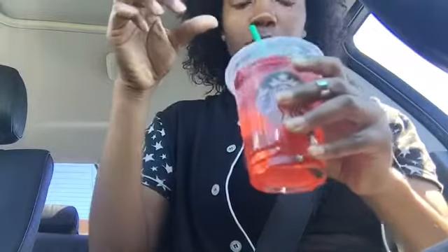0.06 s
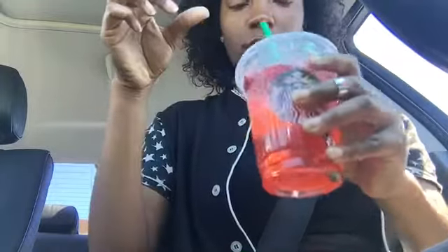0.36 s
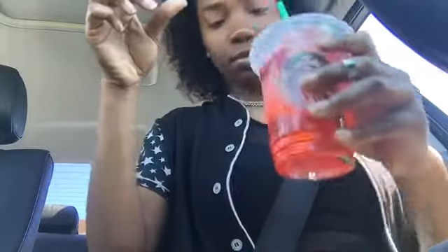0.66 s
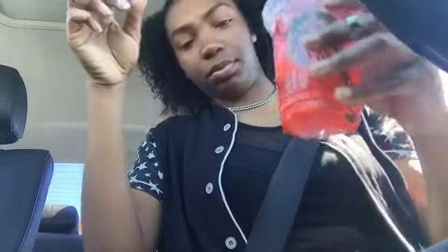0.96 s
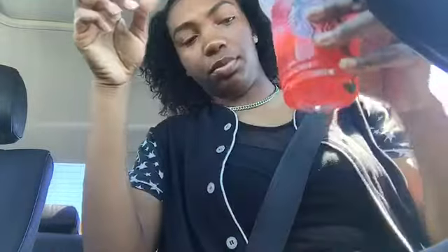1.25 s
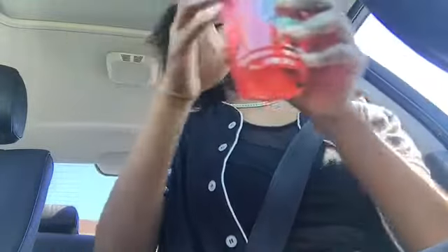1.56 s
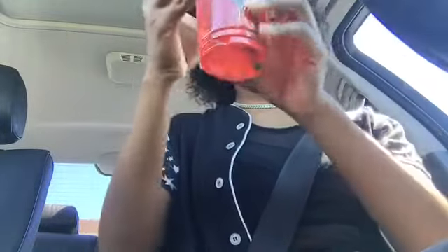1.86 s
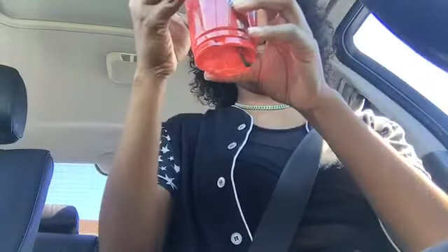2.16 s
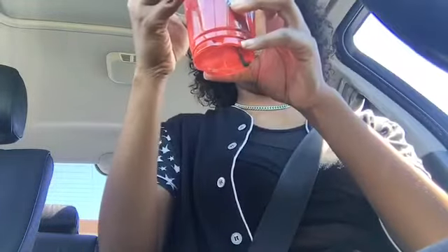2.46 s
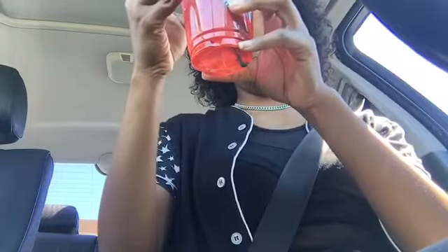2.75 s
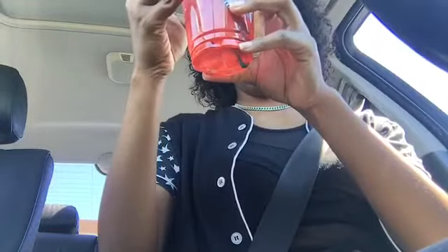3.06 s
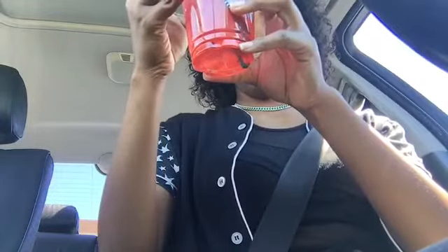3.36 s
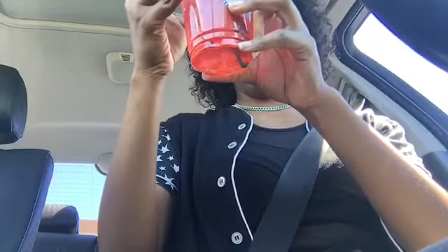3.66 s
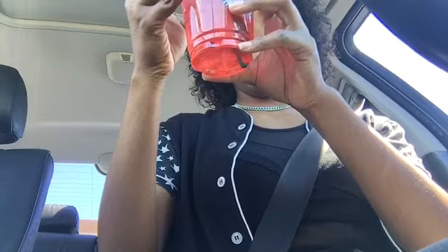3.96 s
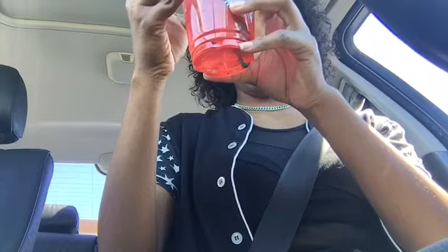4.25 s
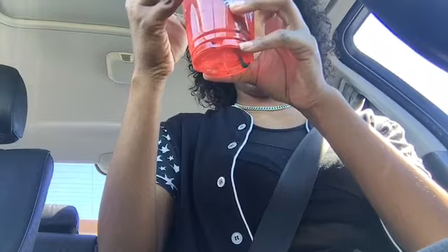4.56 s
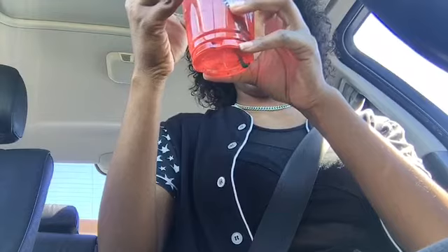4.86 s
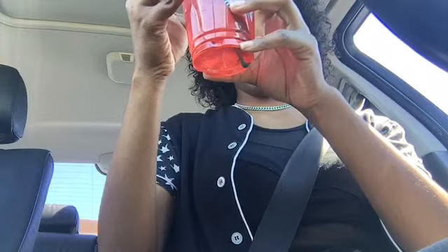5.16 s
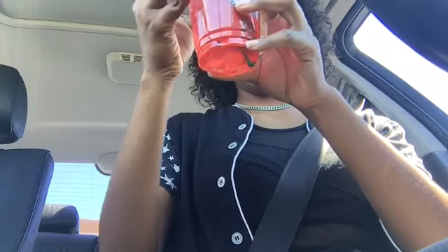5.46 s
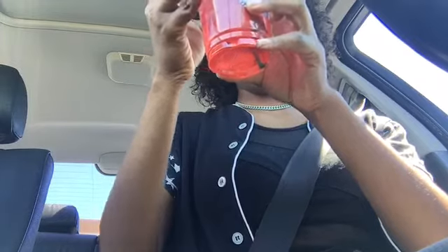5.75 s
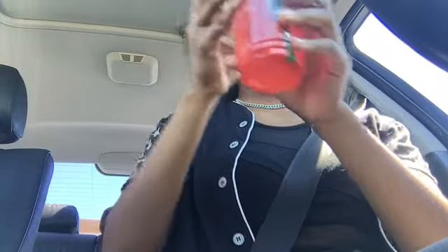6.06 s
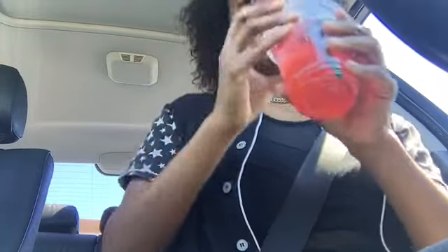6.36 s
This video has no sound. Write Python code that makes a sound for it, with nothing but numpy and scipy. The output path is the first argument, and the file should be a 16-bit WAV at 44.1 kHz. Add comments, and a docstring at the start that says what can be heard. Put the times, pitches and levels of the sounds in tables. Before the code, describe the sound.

Inside a parked car, the engine idles with a low hum and the air conditioning blows steadily. Close to the microphone, an iced drink is swirled in a plastic cup: liquid sloshes and plops, ice knocks and shuffles, and the lid and straw tick. The cup goes quiet while a low drone swells twice. Near the end the ice knocks again, more briefly, and the straw slides in the lid.

```python
"""Inside a parked car the engine idles and the air conditioning blows. In the first two seconds someone
lifts and swirls an iced drink in a plastic cup: the liquid sloshes and plops, the ice shuffles and knocks
on the wall, and the lid and straw tick under the fingers. While the cup is held still, a low drone swells
twice, near 3.7 s and 4.6 s; between the swells the machinery settles and a faint whistle fades.
Near 6 s the cup is lowered, and the ice knocks again."""
import sys
import numpy as np
from scipy import signal
from scipy.fft import rfft, irfft, next_fast_len
from scipy.io import wavfile
from scipy.ndimage import uniform_filter1d, map_coordinates

SR = 44100
rng = np.random.default_rng(int(sys.argv[2]) if len(sys.argv) > 2 else 0)


def file_out(sig):
    """Save sig as 16-bit WAV at sys.argv[1]."""
    # one column per channel
    cols = np.atleast_2d(sig).T
    # limit, then scale
    lim = np.clip(cols, -1, 1)
    pcm = np.round(lim * 32767).astype(np.int16)
    wavfile.write(sys.argv[1], SR, pcm)


N = 287091
TIME = np.arange(N) / SR

# ice striking the wall: (time [s], peak level [dB], relative crack level [dB], pitch [Hz], thud gain [dB])
ICE_KNOCKS = [(.041, -43.5, -2, 1540, 3), (.054, -39, -7, 2370, -7), (.069, -36, -17, 1710, 8),
              (0.079, -37, -26, 597, 6), (.172, -34.5, -8, 1720, 0), (.2, -43, -9, 2000, 0),
              (.247, -31.5, -12.5, 2510, 8), (0.401, -31.5, -17, 2000, -7), (0.482, -31.5, -25, 1680, -5),
              (.524, -32, -14, 1090, -3), (0.5504, -20.5, -23, 1530, -3), (.6, -42, 4, 3700, 0),
              (.623, -26, -19, 1970, 5), (0.7659, -17.5, -12, 1100, 4), (0.7689, -23, -7, 1700, -2),
              (0.7885, -23, -28, 1310, -3), (0.7916, -33, -28, 1400, -9), (0.821, -27.5, -17, 2520, -7),
              (.849, -30, -22, 1200, -7), (0.925, -32.5, -15, 1000, -4), (0.9504, -28.5, -10, 1240, -6),
              (.964, -39, -9, 2400, 6), (.974, -31.5, -13, 1670, -10), (.995, -34, -23, 1450, -5),
              (1.013, -38, -25, 1140, -2), (1.045, -32.5, -5, 3000, 4), (1.076, -32, -14, 1110, -7),
              (1.098, -42, -15, 980, -2), (1.156, -37.5, -13, 1420, -2), (1.175, -35.5, -12, 1100, 5),
              (1.29, -36.5, -14, 1010, 0), (1.729, -35.5, -15, 800, 0), (1.735, -41, -18, 1400, 11),
              (1.798, -39.5, -19, 1680, -5), (5.85, -45.5, -14, 2400, 4), (5.875, -42, -23, 1370, 0),
              (5.926, -36.5, -27, 1200, 3), (6.105, -35, -31, 1330, -6), (6.161, -40, -16, 2400, 3),
              (6.177, -38, -7, 1210, 0), (6.1924, -26.5, -19, 2010, 6), (6.204, -35, -18, 1800, 7),
              (6.229, -37, -17, 1510, 6), (6.272, -41, -15, 2000, -2)]
# modes of the filled cup: (frequency [Hz], bandwidth [Hz], gain [dB])
CUP_MODES = [(913, 69, 7), (1176, 28, 2.5), (1447, 22, 12.5), (1668, 11, 9.5), (1959, 30, 7.5),
             (2330, 34, 8.5), (2520, 13, 12.5), (2730, 25, 10), (4400, 37, 6), (4707, 27, 7.5),
             (5610, 210, 8.5), (6250, 80, 7), (6380, 130, 7), (11600, 300, 8.5)]
# force spectra of the ice's contacts: (frequency [Hz], relative spectral level [dB])
KNOCK_SPECTRUM = [(120, -21), (290, 3), (560, -2), (800, 0.5), (1000, 3.5), (1450, -3), (2000, -4),
                  (3200, -11), (6000, -40.5), (15000, -65)]
CRACK_SPECTRUM = [(1500, -14), (3000, -4.5), (3900, 4.5), (4700, 4.5), (7000, -1.5), (8300, -7),
                  (12000, -10.5), (15500, -17)]
JOSTLE_SPECTRUM = [(200, -10), (400, -20), (700, -12.5), (900, -12.5), (1120, -4), (2350, -7.5),
                   (2800, -13), (4500, -21), (9000, -46.5)]
SCRAPE_SPECTRUM = [(1500, -25), (3000, 11.5), (3900, 8.5), (4700, 1.5), (7000, -3), (8300, -10.5),
                   (12000, -12.5), (15500, -16)]
RUB_SPECTRUM = [(300, -16), (700, -13.5), (1200, -0.5), (1900, -2.5), (2500, -2), (3200, -9), (6000, -17),
                (12000, -36)]
# jostling of the ice as the cup is lifted, then lowered: (time [s], level [dB])
LIFTING = [(0, -45), (.35, -49), (.5, -44.5), (.7, -43.5), (.8, -39.5), (.9, -48), (.99, -45), (1.04, -49),
           (1.17, -48.5), (1.27, -51), (1.45, -59.5), (1.68, -54.5), (1.78, -53.5), (2.1, -69)]
LOWERING = [(5.75, -74), (5.9, -63), (6.03, -69), (6.13, -54), (6.19, -52), (6.25, -52.5), (6.38, -53.5),
            (6.51, -55.5)]
# a cube drags along the wall: (time [s], level [dB], hold [s])
ICE_RUBS = [(.17, -47, .012), (.40, -43.5, 0.021), (0.485, -43, .01), (0.557, -44, .012),
            (.624, -42, 0.016), (0.95, -42.5, 0.023), (1.166, -48.5, 0.022), (1.724, -54, 0.014),
            (3.72, -54, 0.013), (5.865, -65, 0.012), (6.103, -57, .012), (6.163, -47.5, .008),
            (6.19, -40, .008)]

# the drink slops against the wall: (time [s], level [dB])
SLOPS = [(.05, -41), (.16, -41), (.28, -50), (.405, -43.5), (.54, -48), (.65, -39.5), (.77, -50),
         (.975, -47), (1.085, -49.5), (1.81, -50), (5.94, -49.5)]
# resonances of the air above the drink: (frequency [Hz], bandwidth [Hz], relative level [dB])
CAVITY_MODES = [(905, 170, 0), (975, 220, -5), (320, 220, -7)]
# air pockets ringing in the drink: (time [s], peak level [dB], pitch [Hz])
BUBBLES = [(.056, -30.5, 906), (.149, -30.5, 920), (.169, -31, 910), (.193, -34, 945), (.400, -27, 910),
           (.442, -33.5, 920), (.510, -32, 910), (.524, -27.5, 930), (1.094, -36, 990), (6.161, -38, 895),
           (6.178, -39, 855)]
# lid and straw ticking: (time [s], peak level [dB], frequency [Hz], bandwidth [Hz])
LID_TICKS = [(0.172, -51, 7000, 3500), (.25, -63, 12000, 5000), (.325, -54, 12500, 4000),
             (0.484, -42, 12400, 3000), (.600, -45, 5200, 2400), (0.653, -45, 6800, 3500),
             (.704, -49, 7500, 4500), (.709, -44, 14000, 4000), (.7675, -36, 4740, 900),
             (.83, -55, 6500, 3000), (0.9505, -41, 9700, 4500), (.963, -42, 6950, 3500),
             (1.045, -40, 7000, 3800), (1.186, -51, 5970, 3500), (1.304, -47.5, 4970, 5000),
             (1.329, -47, 4000, 3500), (1.383, -54, 4500, 4000), (1.528, -53.5, 6460, 2500),
             (1.569, -62, 14000, 4000), (1.638, -47, 6300, 1500), (1.719, -43, 5630, 3000),
             (1.797, -46.5, 6000, 4500), (3.722, -52, 4240, 700), (3.725, -56, 6000, 1500),
             (5.842, -61, 5030, 2200), (5.942, -54, 13300, 3000), (6.152, -55, 8900, 5000),
             (6.1775, -44, 7000, 5000), (6.229, -43, 5770, 2000), (6.273, -45.5, 3340, 600),
             (6.355, -68, 10000, 4000), (6.492, -56, 7000, 4000)]
# the straw slides in the lid: (time [s], level [dB], hold [s])
STRAW_SLIDES = [(1.647, -58, 0.02), (1.724, -58, .012), (1.92, -66, 0.032), (6.453, -45, 0.014)]
# resonances of the rubbing straw: (frequency [Hz], bandwidth [Hz], relative level [dB])
STRAW_MODES = [(5900, 2000, 4.5), (4580, 1400, -3), (8500, 1700, -5.5), (11100, 2900, -6)]

# overtones of the engine's firing: (harmonic number, level [dB])
FIRING_HARMONICS = [(2, -41), (3, -54.5), (9, -62.5)]
# rumble of the car body: (frequency [Hz], relative spectral level [dB])
RUMBLE_SPECTRUM = [(15, -28.5), (28, -22), (45, 2), (58, 14), (78, 4.5), (95, 9), (112, -3.5), (135, -18),
                   (220, -55.5)]
# swells of the low drone: (peak time [s], hold [s], level [dB])
DRONE_SWELLS = [(3.495, 0.13, -37.5), (3.737, 0.27, -32), (4.573, 0.1, -31), (4.866, 0.06, -35.5),
                (6.394, 0.068, -46)]
# air from the vents: (frequency [Hz], relative spectral level [dB])
VENT_SPECTRUM = [(100, -1), (190, -2), (270, 2.5), (350, -0.5), (520, -8), (740, -12.5), (1150, -10.5),
                 (1500, -18.5), (2500, -25.5), (2850, -29.5), (4500, -37), (6700, -39), (7900, -45),
                 (15500, -56)]
# duct resonances: (frequency [Hz], bandwidth [Hz], gain [dB])
DUCT_MODES = [(921, 24, 9), (994, 48, 5.5), (1150, 47, 5), (1450, 76, 3.5), (1774, 36, 10),
              (2230, 120, 6.5), (2565, 120, 7.5), (3310, 93, 7), (3494, 62, 6.5), (4050, 200, 5),
              (6360, 420, 1)]
# the blower's hum, a faint whistle, a thin hiss: (frequency [Hz], bandwidth [Hz], relative level [dB])
HUM_BANDS = [(445.5, 21, -8.5)]
WHISTLE_BANDS = [(5634, 87, 0.5)]
HISS_BANDS = [(9680, 500, -3), (11640, 1600, -1.5)]
# envelopes of the whistle and the hiss: (time [s], level [dB])
WHISTLE_ENVELOPE = [(0, -66), (1.4, -73.5), (2.2, -74.5), (3.0, -76), (3.85, -76.5), (4.15, -82),
                    (4.8, -88), (6.5, -82)]
HISS_ENVELOPE = [(0, -84), (2, -83), (2.8, -91), (3.9, -87), (4.2, -81), (4.45, -80), (4.7, -81),
                 (5.2, -82), (5.6, -85), (6, -89)]
# small swells in the hiss: (time [s], level [dB])
HISS_SURGES = [(2.08, -85), (2.31, -83), (2.58, -83), (2.76, -88), (3.02, -78), (3.56, -84), (3.99, -82)]
# bands cancelled by close reflections in the cabin: (frequency [Hz], bandwidth [Hz], gain [dB])
CABIN_NOTCHES = [(1108, 47, -5), (2675, 150, -7), (10560, 310, -3)]


def knocking_ice():
    """Impact excitation: a cube's thud, pitched knock and brittle crack ring the modes of the cup."""
    out = np.zeros(N)
    for s, db, crack_db, hz, thud_db in ICE_KNOCKS:
        wall_mode, cube_mode = (400, 320, thud_db), (hz, 300, 8)
        knock = colour(contact(t60=0.033, chatter=0.1), KNOCK_SPECTRUM)
        knock = body(knock, [wall_mode, cube_mode])
        add(out, s, db, body(knock, CUP_MODES))
        crack = colour(contact(t60=0.033, chatter=0.24), CRACK_SPECTRUM)
        add(out, s, db + crack_db, body(crack, CUP_MODES))
    return out


def swirling_ice():
    """Random collisions: jostling and scraping cubes excite the cup's modes weakly; small chips tinkle."""
    light_modes = [(hz, width, 0.48 * db) for hz, width, db in CUP_MODES]
    bumps = colour(grains(per_s=450, spread_db=-0.5, clump_db=2.0), JOSTLE_SPECTRUM)
    jostle = rms_one(body(bumps, light_modes))
    slips = colour(grains(per_s=1800, spread_db=4.0, clump_db=2.5), SCRAPE_SPECTRUM)
    scrape = rms_one(body(slips, light_modes))
    chip_hz = np.geomspace(4400, 14500, 20)
    touches = grains(per_s=900, spread_db=3.0, clump_db=0.5)
    struck = rng.integers(len(chip_hz), size=N)
    tinkle = sum(resonance(touches * (struck == k), hz, width_hz=350) for k, hz in enumerate(chip_hz))
    chips = rms_one(colour(tinkle, SCRAPE_SPECTRUM))
    motion, ordinary_swirl = stirring(), from_db(-46.5)
    # scraping grows faster with the motion than jostling does
    scraping = from_db(-12) * ordinary_swirl * (motion / ordinary_swirl) ** 1.57
    return motion * jostle + scraping * (scrape + chips)


def dragging_ice():
    """Stick-slip friction: a cube drags along the wall in short, rough runs of slips."""
    level = sum(from_db(db) * swell(s, rise_s=0.0034, hold_s=hold, t60=0.11) for s, db, hold in ICE_RUBS)
    slips = grains(per_s=2100, spread_db=-1.0, clump_db=1.0)
    return level * rms_one(colour(slips, RUB_SPECTRUM))


def sloshing_drink():
    """Cavity resonance: the air above the lapping drink rings hollow, its pitch swaying with the surface."""
    slops = sum(from_db(db) * swell(s, rise_s=0.0088, hold_s=0.015, t60=0.76) for s, db in SLOPS)
    lapping = from_db(-0.5) * stirring()
    swaying_index = np.cumsum(1 + 0.035 * drift(7.11))
    hollow = map_coordinates(narrow_noise(CAVITY_MODES), [swaying_index], mode="mirror")
    return np.hypot(slops, lapping) * rms_one(hollow)


def plopping_drink(rise_s=0.0033, t60=0.017, glide_per_s=4.7):
    """Bubble resonance: a trapped air pocket rings briefly, with a soft start and a rising pitch."""
    out, t = np.zeros(N), TIME[:SR // 10]
    envelope = (1 - np.exp(-t / rise_s)) ** 2 * from_db(-60 * t / t60)
    for s, db, hz in BUBBLES:
        add(out, s, db, envelope * tone(hz * (1 + glide_per_s * t)))
    return out


def ticking_lid():
    """Impulse response of thin plastic: the lid snaps under the fingers, each tick at its own pitch."""
    # fainter ticks come at random while the cup moves
    impulses = grains(per_s=78, spread_db=6.0, clump_db=3.5)
    snaps = signal.fftconvolve(impulses, contact(t60=0.016, chatter=0.14))[:N]
    out = from_db(-19.5) * stirring() * rms_one(band(snaps, hz=5200, width_hz=6200))
    for s, db, hz, width_hz in LID_TICKS:
        add(out, s, db, band(contact(t60=0.053, chatter=0.05), hz, width_hz))
    return out


def sliding_straw():
    """Stick-slip friction: the straw slides through the lid and drives broad resonances of the plastic."""
    level = sum(from_db(db) * swell(s, rise_s=0.0077, hold_s=hold, t60=0.11)
                for s, db, hold in STRAW_SLIDES)
    slips = grains(per_s=5000, spread_db=-4.0, clump_db=2.0)
    rubbing = sum(from_db(db) * rms_one(band(slips, hz, width)) for hz, width, db in STRAW_MODES)
    return level * rms_one(rubbing)


def engine(firing_hz=35.63):
    """Periodic forcing: the firing gives a fundamental and unsteady harmonics over the body's rumble."""
    level_db = -41 - 2 * settled()
    phase = 2 * np.pi * firing_hz * TIME + 0.13 * drift(6.1)
    tones = from_db(level_db) * np.sin(phase)
    for k, db in FIRING_HARMONICS:
        tones += from_db(db + 0.59 * drift(14.0)) * np.sin(k * phase + rng.uniform(0, 2 * np.pi))
    # the body shakes less when the engine runs lighter
    rumble_db = -41 + 1.2 * (level_db - level_db.mean())
    rumble = rms_one(colour(rng.standard_normal(N), RUMBLE_SPECTRUM))
    return np.sqrt(2) * tones + from_db(rumble_db) * rumble


def drone(hz=60.1):
    """Beating: a near-pure low tone swells and interferes with the engine's second harmonic."""
    swells = [from_db(db) * swell(s, rise_s=0.18, hold_s=hold, t60=0.84) for s, hold, db in DRONE_SWELLS]
    return np.max(swells, axis=0) * tone(hz + 0.5 * drift(1.9))


def air_conditioning():
    """Duct resonance colours the flow noise; the blower adds its blade-passing tone and a low hum."""
    flow = colour(rng.standard_normal(N), VENT_SPECTRUM)
    air = rms_one(body(flow, DUCT_MODES))
    blade_hz = 637.5 + 5 * settled() + 3.62 * drift(14.45)
    blades = from_db(-3.5 + 1.5 * drift(10)) * tone(blade_hz)
    blower = from_db(-54.5 - 5.5 * settled()) * (blades + narrow_noise(HUM_BANDS))
    return from_db(-45) * air + blower


def whistle_and_hiss():
    """Amplitude-modulated noise bands: a faint whistle gives way to a high hiss in small swells."""
    whistle = from_db(in_time(WHISTLE_ENVELOPE) + drift(6.8)) * narrow_noise(WHISTLE_BANDS)
    swells = sum(from_db(db) * swell(s, rise_s=0.04, hold_s=0.048, t60=0.2) for s, db in HISS_SURGES)
    hiss_level = np.hypot(from_db(in_time(HISS_ENVELOPE)), swells)
    return whistle + hiss_level * from_db(2.2 * drift(16)) * narrow_noise(HISS_BANDS)


def cabin(x, t60, wet_db):
    """Reverberation: close glass and soft seats give a short, dull wash of reflections."""
    t = TIME[:SR // 4]
    echoes = rng.standard_normal(len(t)) * from_db(-60 * t / t60) * (t > 0.002)
    echoes = colour(echoes, [(2500, 5.5), (15000, -3)])
    echoes /= np.sqrt(np.sum(echoes ** 2))
    return x + from_db(wet_db) * signal.fftconvolve(x, echoes)[:N]


def stirring():
    """Amplitude envelope of the cup's motion; zero while it is held still."""
    return sum(from_db(in_time(rows)) * (TIME >= rows[0][0]) * (TIME <= rows[-1][0])
               for rows in (LIFTING, LOWERING))


def settled(midpoint_s=4.0, takes_s=0.43):
    """Linear ramp from 0 to 1 as the machinery settles."""
    return np.clip((TIME - midpoint_s) / takes_s + 0.5, 0, 1)


def swell(at_s, rise_s, hold_s, t60):
    """Envelope that rises to 1 at the given time, holds, then decays exponentially."""
    attack = np.clip(1 + (TIME - at_s) / rise_s, 0, 1)
    return attack * from_db(-60 * np.clip((TIME - at_s - hold_s) / t60, 0, 2))


def contact(t60, chatter):
    """Contact force: a sharp impulse followed by dying micro-contacts."""
    t = TIME[:SR // 4]
    force = chatter * rng.standard_normal(len(t)) * from_db(-60 * t / t60)
    force[0] += 1
    return force


def grains(per_s, spread_db, clump_db):
    """Poisson process: small collisions of uneven size, louder and softer in clumps."""
    sizes = from_db(spread_db * np.minimum(rng.exponential(1, N), 4)) * rng.choice([-1, 1], N)
    return sizes * (rng.random(N) < per_s / SR) * from_db(clump_db * drift(31))


def resonance(x, hz, width_hz):
    """Damped oscillator with unit gain at its peak."""
    r = np.exp(-np.pi * width_hz / SR)
    feedback = [1, -2 * r * np.cos(2 * np.pi * hz / SR), r * r]
    return signal.lfilter(np.array([1, 0, -1]) * (1 - r * r) / 2, feedback, x + 1e-18)


def band(x, hz, width_hz):
    """Two equal resonances in cascade pass one band with steeper skirts."""
    return resonance(resonance(x, hz, width_hz), hz, width_hz)


def body(x, modes):
    """Modal superposition: each mode lifts its own band, or cuts it if the gain is negative."""
    return x + sum((from_db(db) - 1) * resonance(x, hz, width) for hz, width, db in modes)


def colour(x, spectrum):
    """Minimum-phase filter with the given spectrum."""
    size = next_fast_len(len(x) + SR // 4, real=True) // 2 * 2
    hz, db = np.transpose(spectrum)
    bin_hz = np.arange(size // 2 + 1) * SR / size
    gain = from_db(np.interp(np.log(bin_hz + 1), np.log(hz), db))
    cepstrum = irfft(np.log(gain))
    # folding the cepstrum onto positive time makes the filter causal
    cepstrum[1:size // 2] *= 2
    cepstrum[size // 2 + 1:] = 0
    return irfft(rfft(x, size) * np.exp(rfft(cepstrum)))[:len(x)]


def narrow_noise(bands):
    """Band-limited noise: an independent source in each band."""
    return sum(from_db(db) * rms_one(band(rng.standard_normal(N), hz, width)) for hz, width, db in bands)


def tone(hz):
    """Sinusoid of unit RMS whose phase is the integral of its frequency."""
    return np.sqrt(2) * np.sin(2 * np.pi * np.cumsum(hz) / SR)


def drift(rate_hz):
    """Low-pass noise: a slow random fluctuation of unit RMS."""
    step, run_in = 40, 2000
    r = np.exp(-2 * np.pi * rate_hz * step / SR)
    noise = rng.standard_normal(N // step + run_in + 2)
    slow = signal.lfilter([1], [1, -2 * r, r * r], noise)[run_in:]
    return np.interp(np.arange(N) / step, np.arange(len(slow)), rms_one(slow))


def add(track, s, db, sound):
    """Superpose a sound so that its loudest two milliseconds have the given level."""
    at = round(s * SR)
    top = np.sqrt(uniform_filter1d(sound ** 2, SR // 500).max())
    track[at:at + len(sound)] += (from_db(db) * sound / top)[:N - at]


def in_time(rows):
    """Linear interpolation of a curve at every sample."""
    return np.interp(TIME, *np.transpose(rows))


def from_db(db):
    """Amplitude ratio of a level in decibels."""
    return 10 ** (np.asarray(db) / 20)


def rms_one(x):
    """Normalisation to unit RMS."""
    return x / np.sqrt(np.mean(x ** 2) + 1e-20)


def scene():
    """Superposition of the nearby cup and the car, notched by destructive interference in the cabin."""
    cup = sloshing_drink() + plopping_drink() + swirling_ice() + dragging_ice() + knocking_ice()
    cup += ticking_lid() + sliding_straw()
    car = engine() + drone() + air_conditioning() + whistle_and_hiss()
    return body(cabin(cup, t60=0.04, wet_db=-13) + car, CABIN_NOTCHES)[None]


def record(dry):
    """Band limiting: a steep elliptic low-pass removes the highest treble."""
    cutoff_hz = 15900
    return signal.sosfilt(signal.ellip(12, 0.1, 80, cutoff_hz, fs=SR, output="sos"), dry)


dry = scene()
out = record(dry)
file_out(out)
```